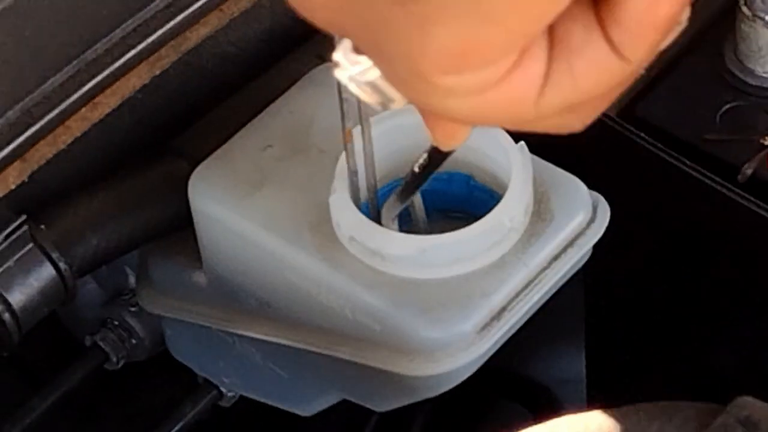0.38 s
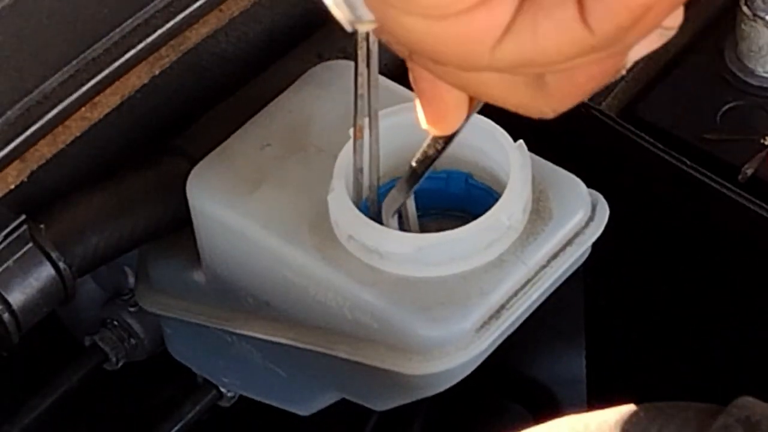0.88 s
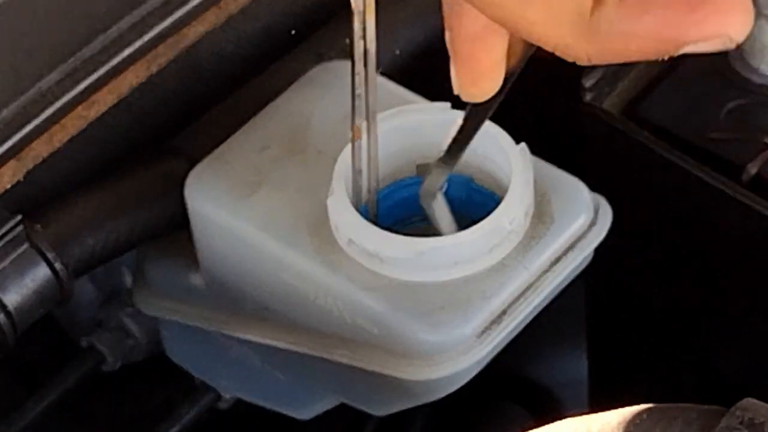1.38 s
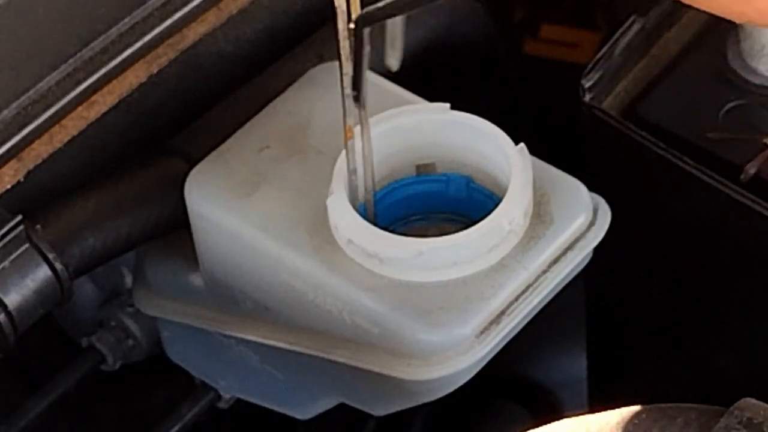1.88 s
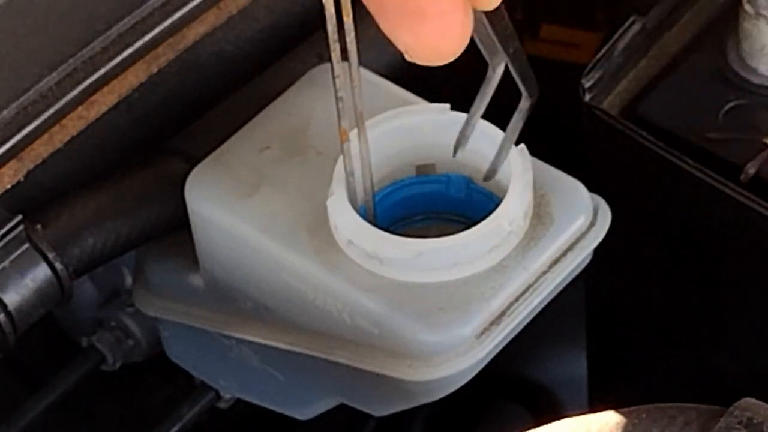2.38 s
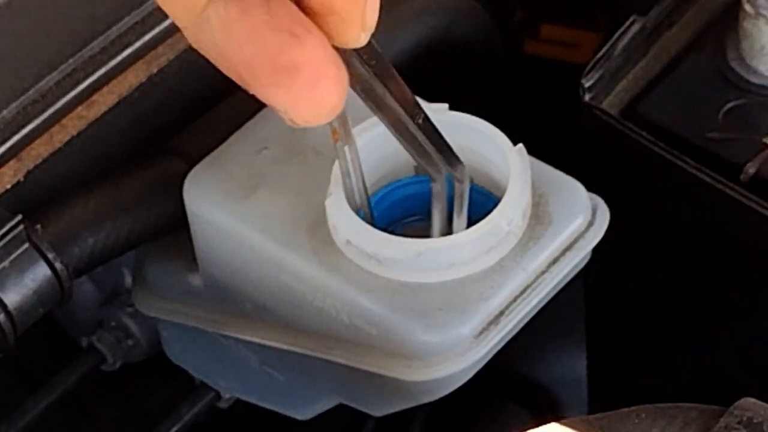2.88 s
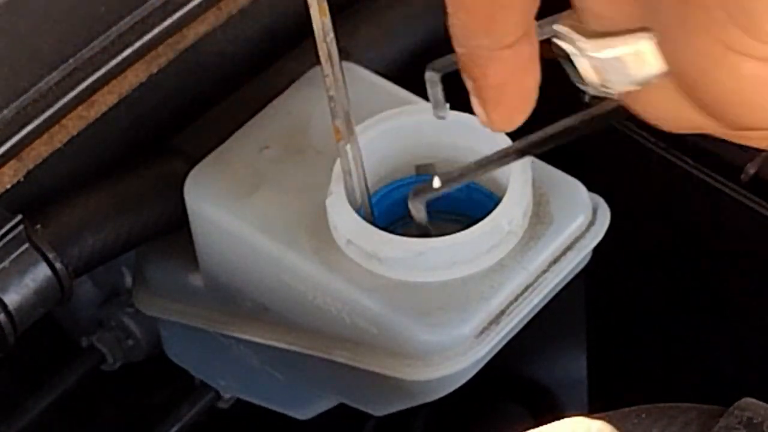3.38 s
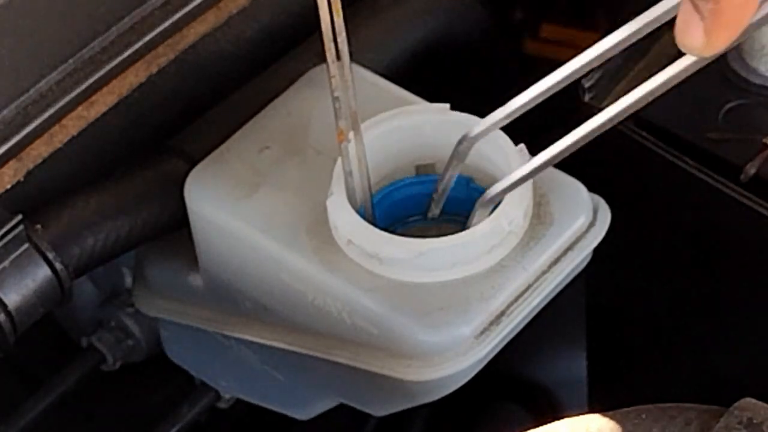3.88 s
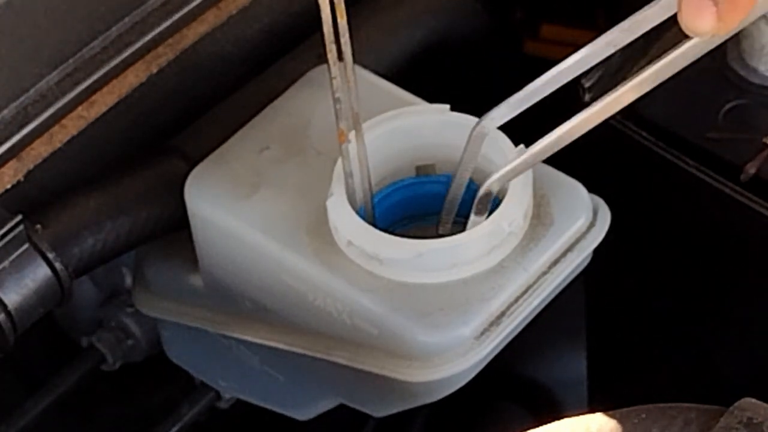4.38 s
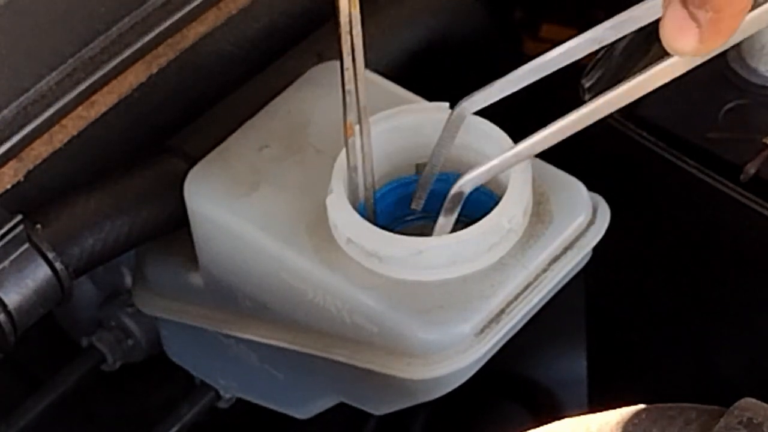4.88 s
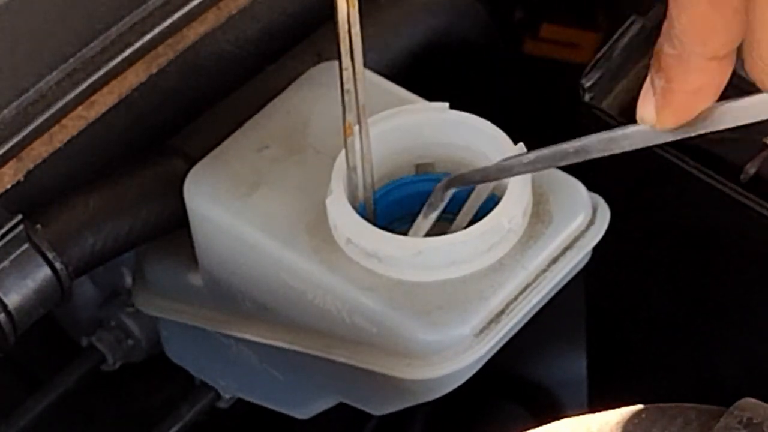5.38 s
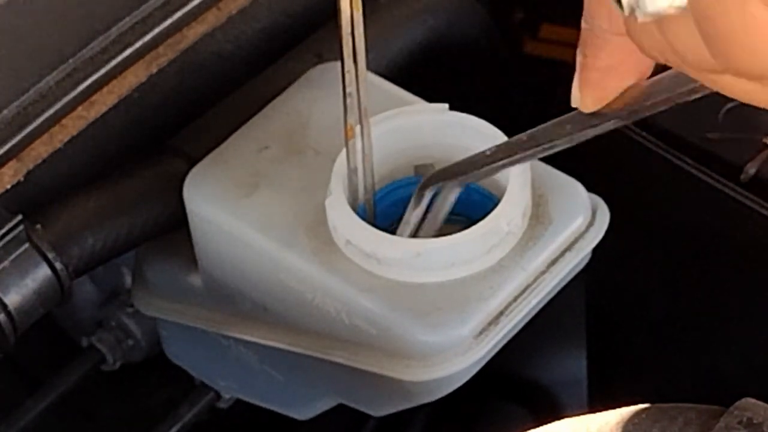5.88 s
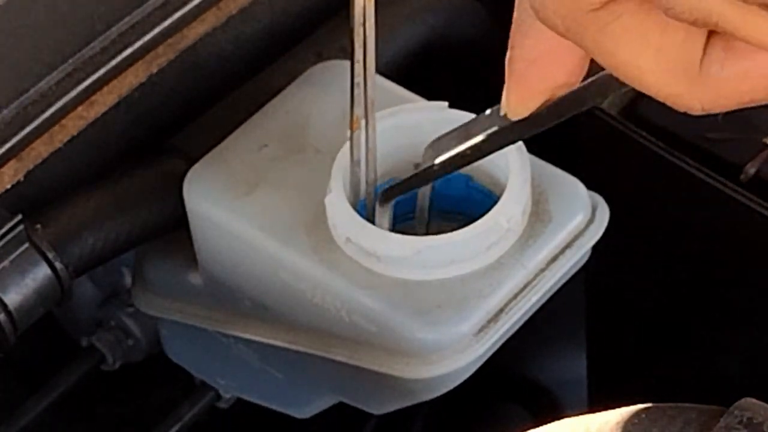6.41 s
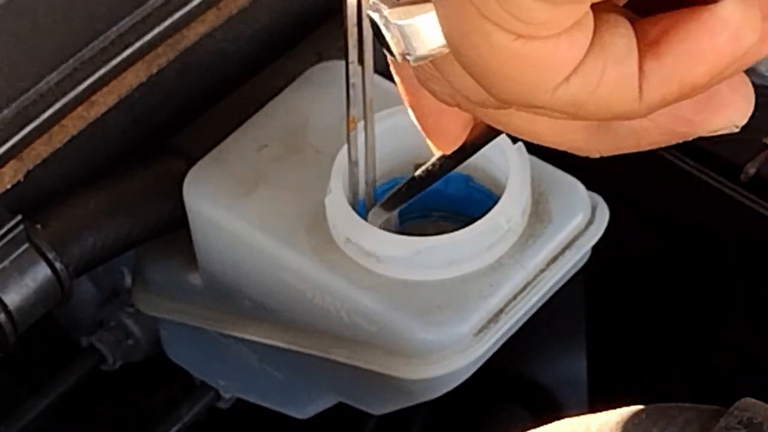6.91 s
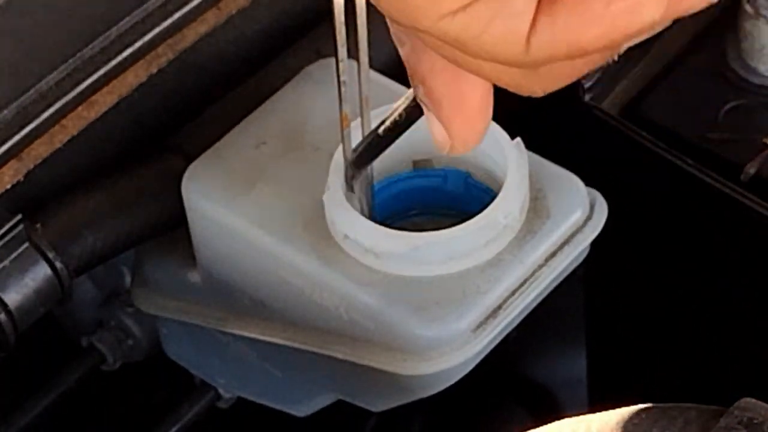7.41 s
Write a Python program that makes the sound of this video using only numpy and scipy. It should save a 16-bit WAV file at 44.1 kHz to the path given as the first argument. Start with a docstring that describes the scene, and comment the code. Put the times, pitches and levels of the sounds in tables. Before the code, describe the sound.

Close stereo pickup outdoors beside a small plastic fluid tank. Faint steel ticks come first, then a sudden bright snap of tweezers with a dry plastic clack and a brief hollow drum. Afterwards only sparse, light clicks and barely audible rubbing. A small bird whistles quick gliding phrases that bounce off nearby walls, over soft distant traffic and a wavering engine drone. A last flurry of ticks ends it.

```python
"""Far traffic rumbles with a wavering engine drone under a steady outdoor hush, all filtered noise and sines.
Steel tweezers tick lightly at a plastic strainer in the neck of a small fluid tank under an open car bonnet,
then snap free once and make the hollow tank drum; noise bursts and decaying modes make each contact.
Sparser picking follows, with faint rubbing, while a songbird whistles short gliding phrases between
echoing walls. At the very end a last flurry of ticks shakes the tank, and the low rumble rises with it."""
import sys
import numpy as np
from scipy import signal
from scipy.fft import rfft, irfft, next_fast_len
from scipy.io import wavfile
from scipy.ndimage import uniform_filter1d, map_coordinates

SR = 44100
rng = np.random.default_rng(int(sys.argv[2]) if len(sys.argv) > 2 else 0)


def natural_amplitude(level_db):
    """Convert a level in decibels to a linear amplitude factor, elementwise."""
    exponent = np.asarray(level_db, float) / 20
    return 10 ** exponent


def dump(signal):
    """Clip the signal to [-1, 1] and save it as 16-bit WAV at the path in sys.argv[1]."""
    limited = np.clip(np.atleast_2d(signal).T, -1, 1)
    pcm = np.round(limited * 32767).astype(np.int16)
    wavfile.write(sys.argv[1], SR, pcm)


N = 331833

# low rumble colour: (frequency [Hz], relative density [dB])
RUMBLE_COLOUR = [(15, -69), (25, -29.5), (38, -23.5), (62, -13.5), (81, -3.5), (141, -8.5), (210, -14),
                 (243, -15), (600, -28), (780, -51.5), (1320, -120)]
# likeness of the two sides of the rumble: (frequency [Hz], correlation [0-1])
RUMBLE_ALIKE = [(80, 1.0), (400, 0.89)]
# low rumble fader, far traffic, then the shaken tank's rumble at the very end: (time [s], level [dB])
RUMBLE_FADES = [(0, -53.5), (.6, -57.5), (1.4, -56), (1.7, -59), (3.5, -55), (4.3, -57), (6.2, -55),
                (7.1, -57), (7.52, -47.5)]
# engine drone swells: (peak time [s], level [dB], rise [s], fall [s])
DRONE_SWELLS = [(0.301, -57, 0.91, 0.38), (1.4, -61.5, 1.307, 0.13), (1.93, -61, 0.46, 0.37),
                (3.55, -54, 1.9, 1.4), (6.2, -53.5, 0.92, 0.85), (7.37, -52, 0.15, 0.29)]
# outdoor hush colour: (frequency [Hz], relative density [dB])
HUSH_COLOUR = [(180, -23.5), (300, -14), (373, -3.5), (399, -23), (549, -8), (649, -12.5), (1020, -7),
               (1110, -9.5), (1360, -14), (1480, -11), (2320, -18.5), (4030, -23.5), (6670, -33.5),
               (15800, -41), (16050, -63)]
# likeness of the two sides of the hush: (frequency [Hz], correlation [0-1])
HUSH_ALIKE = [(300, 0.2295), (700, 0.34), (1400, 0.494), (3000, 0.19), (7000, 0.2)]
# outdoor hush fader: (time [s], level [dB])
HUSH_FADES = [(0, -59), (.6, -61.5), (2.2, -63.5), (3.3, -61.5), (5, -64.5), (7.1, -65), (7.52, -61)]

# bird phrases, note by note, before each phrase's own level and pitch factor:
# (time in phrase [s], length [s], first pitch [Hz], goal pitch [Hz], level [dB])
HOOK = [(0, 0.034, 2950, 3030, -11), (0.023, 0.023, 3032, 3120, 0.5), (0.037, .027, 3100, 1970, 8),
        (.085, 0.029, 3120, 3000, -6)]
BUZZ = [(0.099, 0.153, 1950, 2432, 0)]
SWOOP = [(0, 0.079, 4050, 2953, 4.2), (.07, 0.039, 2806, 2458, 7.3), (0.108, .028, 2450, 3137, 3.4),
         (.132, 0.055, 3160, 2930, 5)]
STEPS = [(0, 0.057, 2984, 3656, -0.5), (0.036, 0.04, 2980, 2324, 7.5), (.114, 0.085, 1977, 2085, 1)]
CHATTER = [(0, 0.014, 2927, 2660, 1.5), (0.013, 0.019, 2444, 2960, 7), (.042, 0.019, 2900, 3130, 0),
           (.059, 0.025, 1950, 3056, 6.5), (.079, 0.02, 3040, 3450, 0)]
# the song: (time [s], phrase, level [dB], pitch factor [ratio])
SONG = [(2.382, HOOK, -60.5, 1.014), (2.382, BUZZ, -61.5, 1), (2.885, SWOOP, -63, 1.013),
        (3.375, SWOOP, -60.5, 0.98), (3.9, SWOOP, -63.5, 0.99), (4.48, STEPS, -64, 1.008),
        (5.094, CHATTER, -64.5, 1.006), (5.572, STEPS, -64, 1.01), (6.668, CHATTER, -65.5, 1.01),
        (7.103, HOOK, -61, 1.01), (7.103, BUZZ, -57, 0.99)]
# delayed paths of the bird, first a near smear of the direct sound, then two wall echoes: (delay [s], mirror
# level [dB], scattered level [dB], smear t60 [s])
BIRD_PATHS = [(.004, -14, -5, 0.032), (.053, -14, -7, 0.032), (.105, -16.5, -14.5, 0.035)]

# tips and fingers rubbing: (peak time [s], level [dB], rise [s], fall [s])
RUBS = [(.8, -77.5, 0.3, .3), (1.48, -72, .3, 0.46), (1.95, -73.5, 0.16, 0.34), (3.1, -76, 1, 1.7),
        (7.0, -80, 4.8, 1.44), (7.47, -65, 0.057, 0.15)]
# rubbing colour: (frequency [Hz], relative density [dB])
RUB_COLOUR = [(2500, -19.5), (4500, 0.5), (9000, -8.5), (15800, -13.5), (16050, -30)]
# modes of the hollow tank: (frequency [Hz], width [Hz], relative level [dB])
TANK_MODES = [(159.6, 48, 4), (233, 51, -0.5), (318, 41, 3.5), (473.6, 60, -15.5), (559.3, 120, -14),
              (890, 90, -14.5)]
# dragging tips that shake the tank: (peak time [s], level [dB], rise [s], fall [s], top of the push [Hz])
DRAGS = [(1.259, -40, 0.028, 0.079, 740), (1.305, -40.5, 0.025, 0.05, 800), (1.345, -41, 0.024, 0.053, 800),
         (1.387, -32.5, .012, 0.031, 905), (1.428, -45.5, .04, 0.12, 700.5),
         (5.896, -46.5, 0.023, 0.078, 476.7), (7.45, -55.5, 0.59, 0.13, 199.7),
         (7.482, -43, 0.01, 0.036, 130), (7.502, -38.5, 0.02, .3, 129)]

# tip contacts: (time [s], steel tick level [dB], neck ring level [dB], strainer clack level [dB])
CONTACTS = [(0.769, -44, -76, -76), (0.788, -53, -80, -80), (0.839, -59, -80, -80), (0.857, -59, -80, -80),
            (1.0466, -81, -45.5, -44), (1.254, -42, -37.5, -38), (1.2908, -34, -25.5, -25),
            (1.2933, 0.5, -27.5, -21.5), (1.2974, -14, -41.5, -32), (1.3008, -7.5, -42.5, -20.5),
            (1.3037, -15, -43, -23), (1.3805, -24, -35, -26), (1.39, -22.5, -46, -28.5),
            (1.476, -31, -63, -32), (1.9094, -57.5, -67.5, -55.5), (1.986, -52, -71, -60),
            (2.584, -61, -65.5, -47), (3.0704, -37, -49.5, -45), (3.3715, -44.5, -70, -38.5),
            (3.466, -45, -41, -42), (3.5701, -45, -68, -40), (3.675, -48.5, -49.5, -41),
            (3.7515, -51, -52, -43), (4.116, -44.5, -46, -37.5), (4.245, -54, -54.5, -47),
            (4.801, -65, -70.5, -45.5), (5.8914, -69.5, -36.5, -42.5), (6.577, -50, -58.5, -53),
            (6.736, -55, -32, -43), (7.2354, -47, -77.5, -54), (7.382, -55, -43.5, -42.5),
            (7.3994, -40.5, -34, -35), (7.449, -42.5, -56, -38.5), (7.458, -54, -35, -39),
            (7.47, -52, -60, -56), (7.476, -50, -47, -49), (7.497, -53, -60, -49), (7.511, -55, -46, -45.5)]
# tweezer modes: (frequency [Hz], relative level [dB])
STEEL_MODES = [(4810, -12), (6090, -4.5), (9290, 5.5), (11700, -7.5), (12700, -4), (14100, 4.5),
               (15400, -12)]
# colour of the strainer's dry clack: (frequency [Hz], relative density [dB])
STRAINER_COLOUR = [(500, -39), (1200, -8), (2200, -3.5), (2600, 1.5), (3100, -2), (4400, -11.5),
                   (6500, -19), (15000, -33)]
# strainer modes, nominal: (frequency [Hz], level over a hard clack [dB], t60 [s])
STRAINER_MODES = [(2603, -5, .03), (3280, -6, 0.013), (2196, -10.5, 0.02)]
# mode of the plastic neck, nominal: (frequency [Hz], t60 [s])
NECK_MODE = (1640, 0.013)


def unit(x):
    """Scaled to rms 1."""
    return x / np.sqrt(np.mean(x ** 2) + 1e-20)


def along(points, hz):
    """(Hz, value) points read on a log frequency axis."""
    f, v = np.transpose(points)
    return np.interp(np.log(hz + 1), np.log(f + 1), v)


def fader(points):
    """(s, dB) points joined by straight lines, one value a sample."""
    s, db = np.transpose(points)
    return np.interp(np.arange(N) / SR, s, db)


def wobble(rate):
    """A smooth random curve, rate knots a second."""
    knots = rng.standard_normal(int(N * rate / SR) + 4)
    return map_coordinates(knots, [np.arange(N) * rate / SR])


def surge(s, db, rise, fall):
    """A gain that climbs 20 dB in rise seconds to its peak and sinks 20 dB in fall seconds."""
    t = np.arange(N) / SR - s
    return natural_amplitude(db - 20 * np.maximum(-t / rise, t / fall))


def sine(hz):
    """A sine that follows a pitch curve."""
    return np.sin(2 * np.pi * np.cumsum(hz) / SR)


def decay(t, t60):
    """A gain that sinks 60 dB in t60 seconds."""
    return natural_amplitude(-60 * t / t60)


def filtered(x, response):
    """x shaped by a complex response of frequency."""
    n = x.shape[-1]
    m = next_fast_len(n + 1024)
    return irfft(rfft(x, m) * response(np.fft.rfftfreq(m, 1 / SR)), m)[..., :n]


def spaced(x, left_lag):
    """Two spaced microphones: the left hears one or two signals late by left_lag samples."""
    sides = np.array([[1], [-1]])
    return filtered(x, lambda hz: np.exp(-1j * np.pi * hz * left_lag / SR * sides))


def rush(colour, alike, left_lag, patchy_db):
    """Stereo noise of rms 1, its gain patchy in time and frequency, its sides alike by frequency."""
    z = signal.stft(rng.standard_normal((2, N)), nperseg=512)[2]
    field = uniform_filter1d(rng.standard_normal(z.shape[1:]), 6, 0)
    field = uniform_filter1d(field, 14, 1)
    pair = signal.istft(z * natural_amplitude(patchy_db * unit(field)), nperseg=512)[1][:, :N]

    def mid_side(hz):
        # this split of mid and side gives the wanted correlation
        angle = np.arccos(np.clip(along(alike, hz), -1, 1)) / 2
        return natural_amplitude(along(colour, hz)) * [np.cos(angle), np.sin(angle)]

    mid, side = filtered(pair, mid_side)
    return unit(spaced(np.array([mid + side, mid - side]), left_lag))


def low_rumble():
    """Low patchy noise, far traffic and lastly the shaken tank, around a wavering engine drone."""
    floor_db = -77  # drone between swells
    swell = natural_amplitude(floor_db) + sum(surge(*row) for row in DRONE_SWELLS)
    drone = swell * natural_amplitude(0.956 * wobble(5.8)) * sine(82.5 + 2.9 * wobble(8.1))
    rumble = rush(RUMBLE_COLOUR, RUMBLE_ALIKE, left_lag=3.8, patchy_db=1.5)
    return drone + natural_amplitude(fader(RUMBLE_FADES)) * rumble


def outdoor_hush():
    """Broad noise with a faint unsteady hum in it, both reaching the left microphone first."""
    hum = natural_amplitude(-13.5 + 3.0 * wobble(12)) * sine(880 + 14 * wobble(12))
    hush = rush(HUSH_COLOUR, HUSH_ALIKE, left_lag=-10.5, patchy_db=1.42)
    return natural_amplitude(fader(HUSH_FADES) + 0.65 * wobble(3.0)) * (hush + spaced(hum, -9.0))


def open_air():
    """Stereo response: direct path with a near smear, wall echoes partly smeared by leaves, a diffuse tail
    short of treble."""
    t = np.arange(SR) / SR
    tail = uniform_filter1d(rng.standard_normal((2, SR)), size=6)
    tail *= decay(t, 1.2) * (1 - np.exp(-t / 0.0024))
    out = natural_amplitude(-5.5) * tail / np.linalg.norm(tail[0])
    out[:, 0] += natural_amplitude(-1.1)  # direct path
    near = t[:SR // 20]
    for delay, mirror_db, scattered_db, smear in BIRD_PATHS:
        start = round(delay * SR)
        out[:, start] += natural_amplitude(mirror_db)
        shared = rng.standard_normal(len(near))
        apart = rng.standard_normal((2, len(near)))
        path = (shared + 1.1 * apart) * decay(near, smear)
        out[:, start:][:, :len(near)] += natural_amplitude(scattered_db) * path / np.linalg.norm(path[0])
    return out


def whistle(length, first_hz, goal_hz, factor, buzzed):
    """One note: its pitch slides exponentially to the goal and its level swells as the slide settles."""
    glide_s_per_khz, glide_loss_db = 0.013, 10.5  # wider slides take longer; a sliding note is weaker
    attack_s, release_s = 0.0015, 0.0068
    vibrato_depth_hz, vibrato_hz = 120, 110.8  # only in the buzz
    waver_hz = 54.7 if buzzed else 17.2  # random unsteadiness, wider in the buzz
    t = np.arange(0, length, 1 / SR)
    unsettled = np.exp(-t / (0.00291 + glide_s_per_khz * abs(first_hz - goal_hz) / 1000))
    pitch = factor * (goal_hz + (first_hz - goal_hz) * unsettled)
    if buzzed:
        pitch += vibrato_depth_hz * np.sin(2 * np.pi * vibrato_hz * t)
    pitch += waver_hz * wobble(59.2)[:len(t)]
    edge = np.clip(np.minimum(t / attack_s, (length - t) / release_s), 0, 1)
    return np.sqrt(2) * edge * natural_amplitude(-glide_loss_db * unsettled) * sine(pitch)


def bird():
    """Whistled phrases, one kind buzzed by fast vibrato; each phrase gets freshly drawn echoes."""
    out = np.zeros((2, N + 2 * SR))
    for s, phrase, db, factor in SONG:
        voice = np.zeros(SR // 2)
        for when, length, first_hz, goal_hz, note_db in phrase:
            note = whistle(length, first_hz, goal_hz, factor, phrase == BUZZ)
            voice[round(when * SR):][:len(note)] += natural_amplitude(db + note_db) * note
        heard = signal.fftconvolve(voice[None], open_air(), axes=1)
        out[:, round(s * SR):][:, :heard.shape[1]] += heard
    return spaced(out[:, :N], 14.57)


def scrape():
    """Faint gritty rubbing of tips and fingers: noise broken into grains."""
    grit = rng.standard_normal((2, N)) * natural_amplitude(4.91 * wobble(280) + 2.6 * wobble(23))
    rub = unit(filtered(grit, lambda hz: natural_amplitude(along(RUB_COLOUR, hz))))
    return rub * sum(surge(*row) for row in RUBS)


def tank_body(f):
    """Response of the hollow tank: resonant modes of alternating sign."""
    modes = enumerate(TANK_MODES)
    return sum((-1) ** k * natural_amplitude(db) * 1j * f * w / (c * c - f * f + 1j * f * w) for k, (c, w, db) in modes)


def tank():
    """Uneven drag forces drum on the hollow tank; a softer stroke pushes only the lower modes."""
    drag = rng.standard_normal(N) * natural_amplitude(0.61 * wobble(40))
    out = np.zeros(N)
    for *stroke, top_hz in DRAGS:
        push = lambda f: 1 / (1 + 1j * f / top_hz) ** 3 / (1 + (85 / (f + 1)) ** 4)
        strength = surge(*stroke)
        boom = filtered(drag, lambda f: tank_body(f) * push(f)) * strength
        out += boom * np.linalg.norm(strength) / np.linalg.norm(boom)  # as strong as its gain curve
    return spaced(out, -6.5) * natural_amplitude([[1.6], [-1.6]])


def steel_tick(t, tick_db):
    """A very short noise click with tweezer modes, scattered by nearby metal; harder ticks are brighter."""
    light_db, light_tilt_db, tilt_per_db = -49.5, -6.5, 0.2  # light tick: level, dB per octave
    tilt_db = light_tilt_db + tilt_per_db * max(tick_db - light_db, 0)
    shared, late, *apart = rng.standard_normal((4, len(t)))
    scatter = (late + 0.95 * np.array(apart)) * (natural_amplitude(-5) * decay(t, 0.026) + natural_amplitude(-33) * decay(t, 0.25))
    ring = sum(natural_amplitude(db + rng.normal(0, 1)) * np.sin(2 * np.pi * hz * t) for hz, db in STEEL_MODES)
    raw = shared * decay(t, 0.00078) + scatter + natural_amplitude(-18.5) * ring * decay(t, 0.041)
    tilt = lambda hz: natural_amplitude(tilt_db * np.log2((hz + 1) / 9000))
    tick = filtered(raw, lambda hz: tilt(hz) / (1 + (3800 / (hz + 1)) ** 4))
    sides_db = np.array([[2.1], [-2.1]])  # left, right
    return tick * natural_amplitude(tick_db + sides_db) / np.abs(tick[:, :200]).max()


def strainer_clack(t, soft, clack_db):
    """A dry coloured rattle and short plastic modes, which ring relatively less when the clack is light."""
    hard_db, ring_per_db = -17.5, 0.7
    noise = rng.standard_normal(len(t)) + 1.2 * rng.standard_normal((2, len(t)))
    rattle = noise * (decay(t, 0.031) + natural_amplitude(-22.5) * decay(t, 0.22))
    clack = filtered(rattle, lambda hz: natural_amplitude(along(STRAINER_COLOUR, hz)))
    clack *= soft * natural_amplitude(clack_db - 1.0) / np.abs(clack).max()
    modes_db = clack_db + ring_per_db * (clack_db - hard_db)
    for hz, db, t60 in STRAINER_MODES:
        level = natural_amplitude(modes_db + db + rng.normal(0, 1.1))
        detuned_hz = hz * (1 + rng.normal(0, 0.015))
        clack += soft * level * decay(t, t60) * np.sin(2 * np.pi * detuned_hz * t)
    return clack


def neck_ring(t, soft, neck_db):
    """One short mode of the plastic neck, slightly detuned at each contact."""
    hz, t60 = NECK_MODE
    detuned_hz = hz * (1 + rng.normal(0, 0.0081))
    return soft * natural_amplitude(neck_db) * decay(t, t60) * np.sin(2 * np.pi * detuned_hz * t)


def tweezers():
    """Each contact sounds steel, strainer and neck; the plastic yields slowly, so its onset is soft."""
    out = np.zeros((2, N + SR))
    t = np.arange(SR // 5) / SR
    soft = 1 - np.exp(-t / 0.0005)  # time for the plastic to yield [s]
    for s, tick_db, neck_db, clack_db in CONTACTS:
        contact = steel_tick(t, tick_db) + strainer_clack(t, soft, clack_db) + neck_ring(t, soft, neck_db)
        out[:, round(s * SR):][:, :len(t)] += contact
    return spaced(out[:, :N], -2.34)


def scene():
    """All sources at the two microphones."""
    return low_rumble() + outdoor_hush() + bird() + scrape() + tank() + tweezers()


def top_cut(x):
    """Nothing passes above the cut-off."""
    return signal.sosfilt(signal.butter(12, 17040, fs=SR, output="sos"), x)


def record(dry):
    """The finished mix holds almost nothing above about 16 kHz."""
    heard = filtered(dry, lambda hz: 1 / (1 + (hz / 16100) ** 60))
    return top_cut(heard)


dry = scene()
out = record(dry)
dump(out)
```